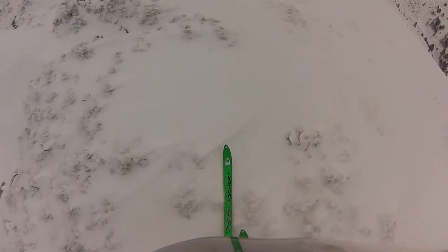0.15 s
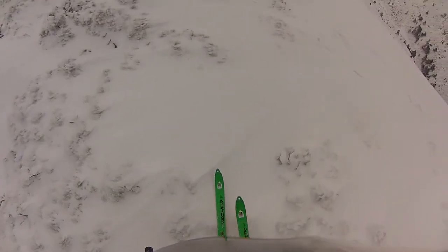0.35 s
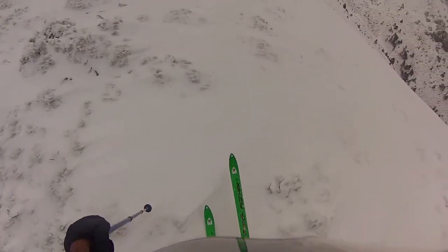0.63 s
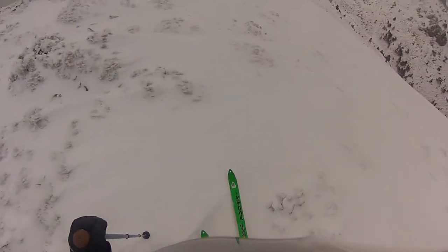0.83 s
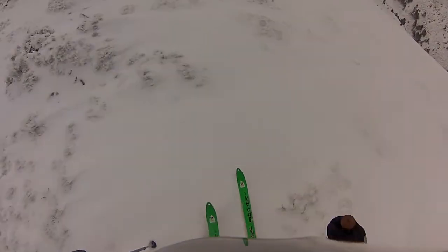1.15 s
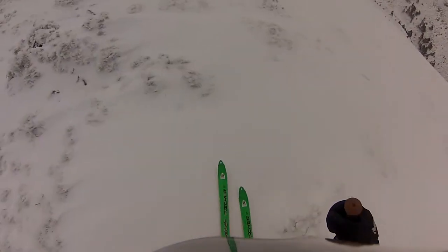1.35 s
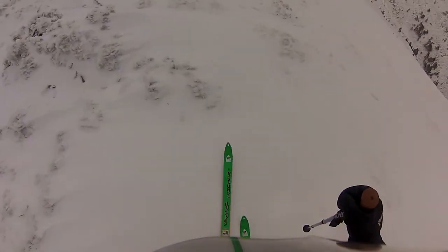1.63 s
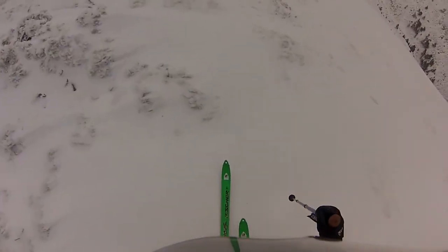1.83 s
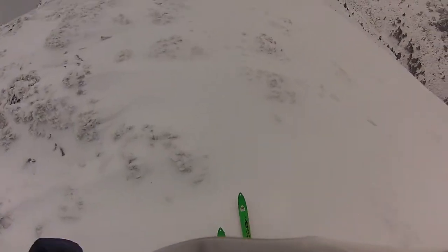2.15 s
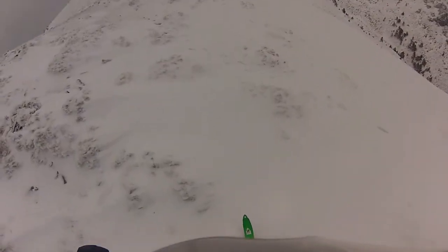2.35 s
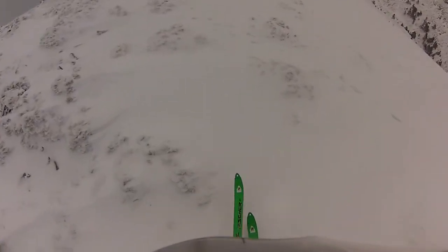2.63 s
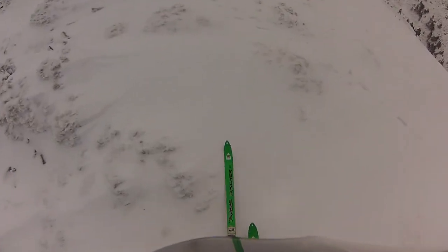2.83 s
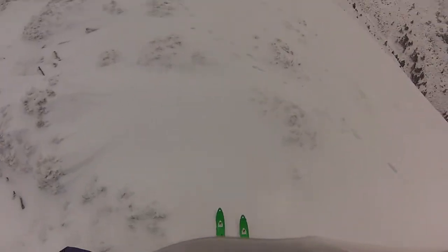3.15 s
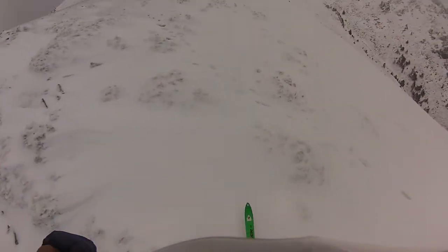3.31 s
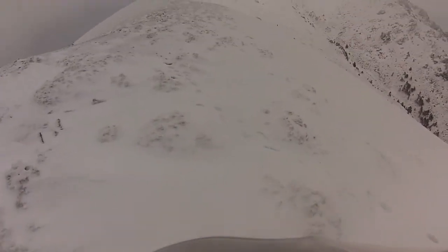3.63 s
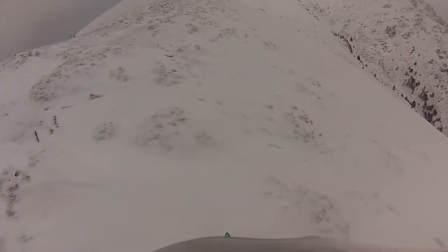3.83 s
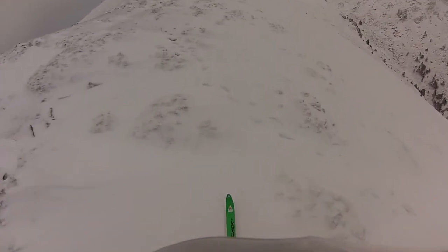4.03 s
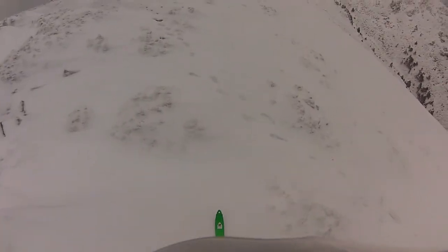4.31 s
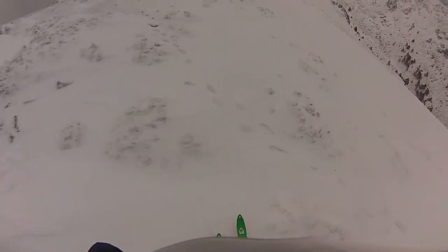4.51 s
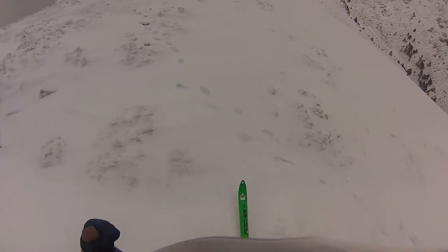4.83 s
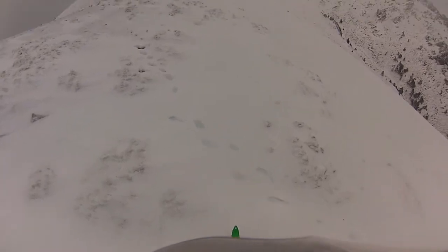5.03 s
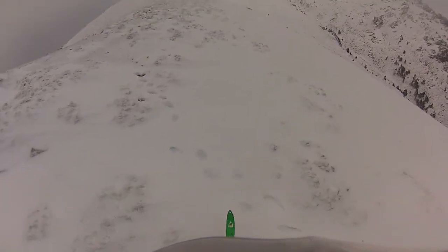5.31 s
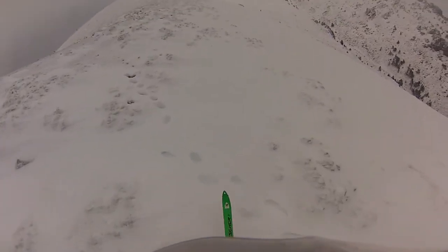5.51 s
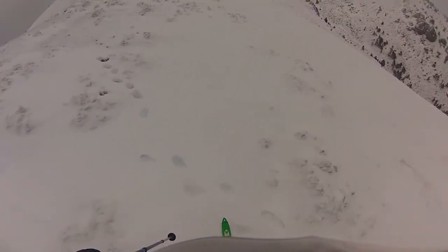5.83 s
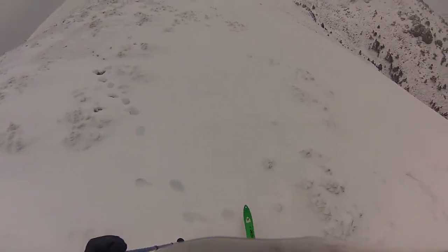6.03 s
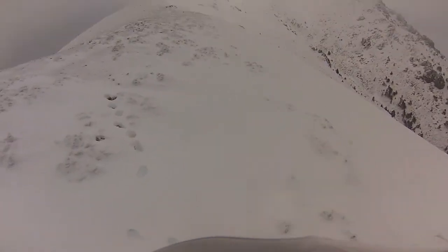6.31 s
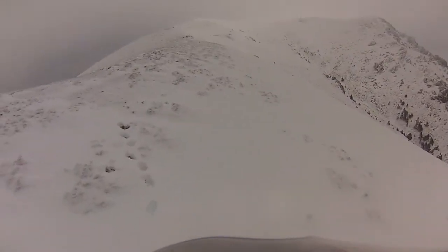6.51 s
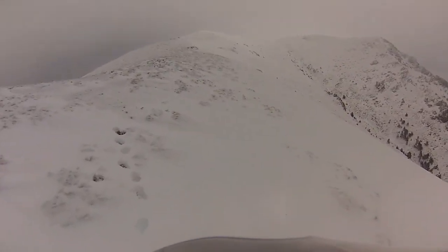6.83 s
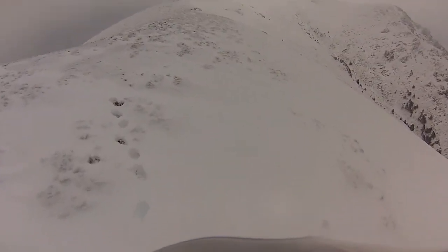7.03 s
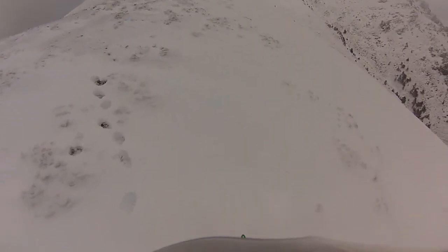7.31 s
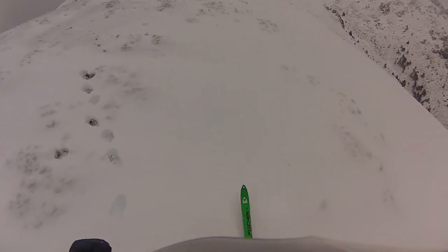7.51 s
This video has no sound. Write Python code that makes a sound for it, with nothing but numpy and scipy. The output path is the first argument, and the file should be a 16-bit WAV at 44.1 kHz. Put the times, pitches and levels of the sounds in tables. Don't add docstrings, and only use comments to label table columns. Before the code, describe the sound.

Outdoors on a snowy slope, a skier strides uphill, heard through a sealed plastic housing on the helmet: boxy, close, with deep wind rumble and faint hiss throughout. At 0 s crust cracks with a soft boot thud; around 0.14 s a buckle rings thinly. Crunches follow near 0.8, 1.5 and 2.3 s, gritty and brief, with soft ski glide between and ice grains clicking on the shell, one sharp at 1.9 s. Stronger crunches come at 2.9 and 3.5 s, with a light jolt. Around 4.1-4.2 s a loud knock and a hard low thump land together. It eases, with crunches near 4.8 s, then the hardest jolt booms at 5.65 s amid strong wind buffeting. Dense crunching, thuds and ticks continue through 6.2-6.9 s, a bright click snaps at 7.15 s, and a last crunch and thud end it around 7.6 s.

```python
import sys
import numpy as np
from scipy import signal
from scipy.fft import rfft, irfft
from scipy.io import wavfile
from scipy.ndimage import uniform_filter1d

SR = 44100
rng = np.random.default_rng(int(sys.argv[2]) if len(sys.argv) > 2 else 0)


def volts_from_decibels(level):
    exponent = np.asarray(level, float) / 20
    return 10 ** exponent


def master_out(mix):
    frames = np.transpose(np.atleast_2d(mix))
    ceiling = np.clip(frames, -1, 1)
    pcm = np.round(ceiling * 32767).astype(np.int16)
    wavfile.write(sys.argv[1], SR, pcm)


N = 337806


def rms_one(x):
    return x / np.sqrt(np.mean(x ** 2) + 1e-20)


def in_time(rows):
    s, *columns = np.transpose(rows)
    return [np.interp(np.arange(N) / SR, s, c) for c in columns]


def drift(rate):
    r = np.exp(-80 * np.pi * rate / SR)
    slow = signal.lfilter([1], [1, -2 * r, r * r], rng.standard_normal(N // 40 + 2002))[2000:]
    return np.interp(np.arange(N) / 40, np.arange(len(slow)), rms_one(slow))


def coloured(spectrum, low_hz, high_hz):
    hz = np.maximum(np.fft.rfftfreq(N, 1 / SR), .1)
    points = np.array(spectrum)
    gain = volts_from_decibels(np.interp(np.log(hz), np.log(points[:, 0]), points[:, 1]))
    gain = gain / np.sqrt((1 + (low_hz / hz) ** 8) * (1 + (hz / high_hz) ** 8))
    return rms_one(irfft(rfft(rng.standard_normal(N)) * gain, N))


def evened(x, size):
    return rms_one(x / np.sqrt(uniform_filter1d(x ** 2, size=size) + 0.2))


def swells(s, db, fall_s, rise_s, bed_db, hold_s=0):
    late = np.arange(0, N + 64, 64)[:, None] / SR - s
    below = np.maximum(-late / rise_s, np.maximum(late - hold_s, 0) / fall_s)
    power = volts_from_decibels(2 * (db - 10 * below)).sum(axis=1)
    power = np.interp(np.arange(N) / 64, np.arange(len(power)), power)
    return 10 * np.log10(power + volts_from_decibels(2 * bed_db))


def shell(x, modes):
    out = 0
    drives = np.broadcast_to(x, (len(modes), np.shape(x)[-1]))
    for k, ((hz, width, db), drive) in enumerate(zip(modes, drives)):
        r = np.exp(-np.pi * width / SR)
        a = [1, -2 * r * np.cos(2 * np.pi * hz / SR), r * r]
        b = np.array([1, 0, -1]) * (1 - r * r) / 2
        out = out + (-1) ** k * volts_from_decibels(db) * signal.lfilter(b, a, drive)
    return out


def steep(x, low_hz, high_hz):
    return signal.sosfilt(signal.butter(4, [low_hz, high_hz], "band", fs=SR, output="sos"), x)


def grains(per_s, spread_db):
    sizes = volts_from_decibels(spread_db * np.minimum(rng.exponential(1, N), 5)) * rng.choice([-1, 1], N)
    return rms_one(sizes * (rng.random(N) < per_s / SR))


def add(out, s, piece):
    i = max(round(s * SR), 0)
    out[i:i + len(piece)] += piece[:N - i]


def ring(hz, db, t60):
    t = np.arange(SR // 2) / SR
    return volts_from_decibels(db - 60 * t / t60) * np.sin(2 * np.pi * hz * t)


# [f/Hz, level/dB per Hz]
PRESSURE_SPECTRUM = [(2, -19), (4, -5.5), (9, 6.5), (14, -10), (20, -6), (30, -20), (45, -20), (65, -30.5),
                     (90, -25.5)]
# [f/Hz, level/dB per Hz]
RUMBLE_SPECTRUM = [(24, -16), (40, -5.5), (60, -2.5), (108, -2.5), (161, -21.5), (390, -35), (511, -38),
                   (581, -34), (942, -43), (1100, -43), (1200, -33.5), (1560, -58), (2640, -120)]
# [peak t/s, level/dB, 10 dB decay time/s]
GUSTS = [(0.159, -22.9, 0.215), (0.389, -22.4, 0.015), (0.939, -22.1, 0.384), (1.13, -25.4, 0.062),
         (1.608, -27.3, 0.161), (1.859, -28.2, 0.4), (2.351, -13.9, 0.155), (3.002, -17.3, 0.016),
         (3.117, -20.4, 0.045), (3.574, -14.4, 0.139), (3.968, -22.6, 0.015), (4.184, -14.1, 0.158),
         (4.885, -21.7, 0.279), (5.67, -12.1, 0.016), (5.73, -20.3, 0.4), (6.341, -15.1, 0.147),
         (6.72, -18.7, 0.015), (6.9, -14.6, 0.015), (7.078, -15.9, 0.039), (7.406, -20.0, 0.105)]
# [peak t/s, level/dB, 10 dB decay time/s]
BUFFETS = [(0.014, -36.9, 0.036), (0.238, -31.9, 0.021), (0.46, -34.6, 0.051), (0.947, -35.5, 0.066),
           (1.54, -27.7, 0.048), (2.323, -30.9, 0.031), (2.508, -42.4, 0.096), (2.91, -25.9, 0.015),
           (3.592, -24.1, 0.048), (3.95, -45.4, 0.035), (4.132, -31.0, 0.015), (4.239, -38.3, 0.018),
           (4.91, -24.0, 0.112), (5.736, -20.9, 0.036), (6.106, -37.8, 0.068), (6.358, -28.2, 0.015),
           (6.65, -38.1, 0.016), (6.871, -32.3, 0.054), (6.942, -43.2, 0.035), (7.123, -36.3, 0.017),
           (7.321, -41.7, 0.016), (7.654, -39.9, 0.017)]
# [peak t/s, level/dB, 10 dB decay time/s]
BOOMS = [(0.197, -36.3, 0.087), (0.806, -45.6, 0.015), (1.194, -50.2, 0.054), (1.837, -38.8, 0.015),
         (2.32, -37.4, 0.019), (2.448, -33.0, 0.018), (2.684, -37.3, 0.064), (2.8, -38.1, 0.31),
         (3.549, -36.5, 0.015), (3.679, -34.8, 0.015), (3.869, -37.7, 0.148), (4.232, -35.8, 0.152),
         (4.905, -39.7, 0.037), (5.65, -37.6, 0.289), (6.049, -40.9, 0.033), (6.309, -34.2, 0.106),
         (6.36, -35.3, 0.216), (6.87, -36.8, 0.155), (7.213, -42.1, 0.058), (7.654, -46.7, 0.398)]


def wind(crunch_db):
    pressure_db = swells(*np.transpose(GUSTS), rise_s=.079, bed_db=-40.5)
    buffet_db = swells(*np.transpose(BUFFETS), rise_s=.099, bed_db=-49.8)
    boom_db = swells(*np.transpose(BOOMS), rise_s=.074, bed_db=-48.3)
    pressure = evened(coloured(PRESSURE_SPECTRUM, low_hz=3.3, high_hz=23.8), size=SR // 4)
    buffet = evened(coloured(PRESSURE_SPECTRUM, low_hz=24.4, high_hz=66.4), size=SR // 6)
    boom = evened(coloured(RUMBLE_SPECTRUM, low_hz=64.5, high_hz=161), size=SR // 6)
    boom = boom * volts_from_decibels(1.8 * drift(18.6))
    rumble = coloured(RUMBLE_SPECTRUM, low_hz=169.4, high_hz=1090) * volts_from_decibels(1.7 * drift(32))
    rumble_db = -54.3 - 0.5 * np.arange(N) / SR
    rumble_db = rumble_db + 0.21 * (boom_db + 46.5) + 0.43 * (crunch_db + 58.5)
    return volts_from_decibels(pressure_db) * pressure + volts_from_decibels(buffet_db) * buffet + volts_from_decibels(boom_db) * boom + volts_from_decibels(rumble_db) * rumble


# [t/s, level/dB, hold/s]
CRUNCHES = [(0.012, -41.0, 0.028), (0.743, -54.9, 0.115), (0.899, -49.3, 0.023), (1.421, -49.4, 0.001),
            (1.487, -51.9, 0.032), (1.573, -54.2, 0.116), (2.228, -50.7, 0.097), (2.389, -44.1, 0.011),
            (2.858, -45.4, 0.06), (2.951, -53.6, 0.055), (3.433, -50.6, 0.035), (3.495, -43.9, 0.065),
            (3.615, -47.1, 0.032), (4.02, -48.9, 0.015), (4.056, -49.2, 0.041), (4.124, -48.8, 0.105),
            (4.793, -45.9, 0.041), (4.861, -48.8, 0.05), (5.392, -50.3, 0.0), (5.481, -50.7, 0.03),
            (5.58, -50.3, 0.102), (5.676, -40.9, 0.016), (5.742, -53.2, 0.058), (6.194, -45.8, 0.043),
            (6.297, -44.6, 0.04), (6.41, -46.9, 0.029), (6.79, -42.0, 0.004), (6.85, -52.1, 0.06),
            (6.95, -48.5, 0.023), (7.599, -50.9, 0.04)]
# [t/s, level/dB]
GLIDE = [
    (0.0, -57.4),
    (0.85, -60.9),
    (1.7, -57.9),
    (2.55, -59.4),
    (3.4, -58.9),
    (4.26, -61.5),
    (5.11, -60.9),
    (5.96, -58.2),
    (6.81, -54.7),
    (7.66, -61.0),
]


def crunch_level():
    s, db, hold_s = np.transpose(CRUNCHES)
    return swells(s, db, .027, .011, *in_time(GLIDE), hold_s)


# [f/Hz, width/Hz, level/dB]
SHELL_LOW = [(1262, 169, -6.5), (1507, 290, -0.5), (1728, 616, -3), (2066, 560, -3.5)]
SHELL_MID = [(3420, 500, 3.2), (4126, 480, 0.8), (4960, 520, -0.8)]
SHELL_HIGH = [(6554, 1560, 1.5), (9470, 1870, 1.5), (11380, 3800, -1), (15700, 2000, -28)]


def crunch(crunch_db):
    hiss_db = -66 + .15 * (crunch_db + 58)
    clumps = volts_from_decibels(3.0 * drift(60))
    snaps = clumps * grains(per_s=900 * clumps, spread_db=1.0) + .4 * rng.standard_normal(N)
    own = np.array([grains(per_s=350, spread_db=2.5) * volts_from_decibels(2.5 * drift(23)) for _ in SHELL_LOW])
    fine = grains(per_s=60, spread_db=3.5) * .3
    fine = fine + volts_from_decibels(2.1 * drift(35)) * rng.standard_normal(N)

    low = rms_one(steep(shell(snaps + 0.8 * own, SHELL_LOW), low_hz=1115, high_hz=2546))
    patches = volts_from_decibels(2.8 * np.array([drift(15) for _ in SHELL_MID]))
    mid_drive = patches * (snaps + 0.62 * own[:len(SHELL_MID), ::-1] + .5 * fine)
    mid = rms_one(steep(shell(mid_drive, SHELL_MID), low_hz=2780, high_hz=5860))
    high = rms_one(steep(shell(fine + 0.19 * snaps, SHELL_HIGH), low_hz=5430, high_hz=16100))
    mid_db = -0.8 + .45 * hiss_db + 0.645 * (crunch_db - 3.6)
    return volts_from_decibels(crunch_db - 2.2) * low + volts_from_decibels(mid_db) * mid + volts_from_decibels(hiss_db - 6.3 + 1.2 * drift(9)) * high


# [t/s, peak level/dB, f/Hz]
KNOCKS = [(.0727, -45.5, 1560), (.4244, -43, 1350), (.8897, -39.5, 1710), (1.482, -44, 1550),
          (1.6367, -41.5, 1720), (2.1768, -44.5, 2270), (2.248, -40, 1250), (2.7637, -40, 1450),
          (2.8886, -35, 2150), (3.271, -42, 2300), (3.3323, -45, 1420), (3.4316, -45, 1460),
          (3.5024, -37, 1230), (4.0148, -40.5, 1690), (4.055, -44, 2000), (4.118, -28, 1900),
          (4.1593, -36.5, 1640), (4.7013, -37, 1750), (4.786, -44, 1500), (4.8663, -38.5, 1320),
          (5.2395, -44.5, 2470), (5.4695, -44, 1460), (5.6732, -37.5, 1310), (6.097, -37.5, 1560),
          (6.1878, -41.5, 1410), (6.4135, -37, 1360), (6.782, -40, 1480), (6.992, -42, 1450),
          (7.4038, -47, 1400), (7.5876, -44, 1380)]
# [t/s, peak level/dB, f/Hz]
CRUMBS = [(0.0154, -34, 1680), (0.0344, -37, 1480), (0.1545, -44, 2100), (0.2399, -45, 1580),
          (0.5601, -44, 2140), (0.7544, -43, 1430), (0.7771, -40, 1230), (0.7926, -40, 1570),
          (0.9144, -39, 1310), (1.0585, -43, 1410), (1.1253, -42, 2220), (1.4087, -43, 1570),
          (1.4326, -42, 1560), (1.8567, -43, 1570), (2.1475, -45, 2120), (2.2084, -46, 1510),
          (2.2233, -42, 1540), (2.372, -44, 1330), (2.3885, -39, 1310), (2.6778, -42, 2100),
          (2.8519, -36, 1550), (2.9607, -42, 1320), (3.3747, -45, 1480), (3.4655, -37, 2020),
          (3.5523, -39, 1630), (3.5768, -40, 1200), (3.6296, -39, 1840), (4.3605, -46, 1510),
          (4.8179, -34, 1230), (5.3916, -43, 1690), (5.6092, -35, 1400), (5.7428, -40, 1260),
          (6.2537, -40, 1480), (6.2881, -39, 1480), (6.3135, -34, 1420), (6.4642, -34, 1610),
          (6.8044, -39, 1980), (6.9456, -37, 1490), (7.0798, -42, 1270), (7.1197, -46, 1510),
          (7.2404, -40, 1640), (7.4754, -45, 1560), (7.5368, -47, 1430), (7.639, -39, 1660)]


def knocks(lumps, gain_db, crumble_s):
    out, t = np.zeros(N), np.arange(SR // 20) / SR
    for (s, db, hz), noise in zip(lumps, rng.standard_normal((len(lumps), len(t)))):
        burst = noise * np.exp(-t / crumble_s) + 9.0 * (t == 0)
        knock = steep(shell(burst, SHELL_LOW), low_hz=1060, high_hz=3230)
        knock = knock + shell(knock, [(hz, 320, 8.0)])
        add(out, s - .0008, volts_from_decibels(db + gain_db) * knock / np.abs(knock).max())
    return out


# [t/s, peak level/dB]
THUDS = [(0.014, -46), (0.914, -48), (1.416, -52), (2.394, -42), (3.062, -46), (3.5, -37), (3.622, -51),
         (4.106, -42), (4.237, -35.5), (5.621, -36), (6.335, -30.5), (6.393, -36.5), (7.657, -36)]


def thuds():
    out, t = np.zeros(N), np.arange(SR // 10) / SR
    for (s, db), noise in zip(THUDS, rng.standard_normal((len(THUDS), len(t)))):
        puff = signal.lfilter([1], [1, -.95], noise * np.exp(-t / 0.011))
        puff = steep(puff, low_hz=125, high_hz=950)
        add(out, s - .001, volts_from_decibels(db - 2.5) * puff / np.abs(puff).max())
    return out


# [t/s, level/dB]
JOLTS = [
    (3.49, -36),
    (3.63, -39),
    (4.228, -29),
    (5.652, -26),
    (6.205, -34),
]


def jolts():
    out = np.zeros(N)
    for s, db in JOLTS:
        add(out, s, ring(110, db, t60=.3))
    return out


# [t/s, peak level/dB, brightness level/dB, strongest middle f/Hz]
TICKS = [(0.1289, -45.3, 6.2, 3250), (0.634, -43.6, 2.9, 3410), (0.6437, -51.8, 11.2, 3470),
         (0.8008, -45.9, 9.0, 4590), (0.9035, -33.4, 4.3, 4050), (1.0558, -42.1, 5.5, 4940),
         (1.6495, -41.2, -0.0, 4810), (1.7946, -34.9, 1.9, 3460), (1.8665, -26.6, -3.7, 3400),
         (1.9692, -40.0, -2.2, 3400), (2.1761, -40.1, 5.2, 3610), (2.2666, -32.7, -5.1, 3420),
         (2.7201, -32.9, -3.8, 3430), (2.9905, -32.1, -5.5, 3410), (3.0529, -30.3, 0.3, 3390),
         (3.5019, -39.8, -11.7, 4010), (3.5747, -36.4, -18.4, 3490), (3.6828, -35.1, -7.5, 3420),
         (4.0205, -52.8, 13.0, 3420), (4.5677, -35.8, 0.7, 4520), (5.2408, -30.1, -0.2, 3410),
         (5.3477, -42.4, -0.1, 3420), (5.6996, -35.5, -12.3, 3430), (5.7458, -32.2, -10.4, 3420),
         (5.9067, -38.1, -5.4, 3390), (6.4646, -40.5, 20.1, 5140), (6.7202, -38.3, 0.5, 4220),
         (6.7738, -39.9, -9.1, 4820), (7.1502, -26.4, -1.6, 3390), (7.567, -41.5, -0.6, 4800)]
# [t/s, peak level/dB, brightness level/dB]
SPECKS = [(0.4215, -56.6, 9.1), (0.5585, -41.6, -13.8), (0.7925, -50.7, 9.1), (0.8215, -48.2, 8.4),
          (1.1253, -45.1, -0.1), (1.3582, -54.1, 10.9), (1.4845, -49.5, 6.0), (1.9342, -48.9, 6.3),
          (1.9526, -54.7, 9.8), (2.1106, -46.2, -4.1), (2.611, -53.2, 7.0), (2.7326, -48.9, 0.3),
          (2.7673, -43.2, -2.3), (3.1307, -44.7, -2.5), (4.1171, -45.2, -6.2), (4.6349, -51.2, 1.9),
          (5.1538, -53.0, 5.8), (5.1748, -49.8, 9.7), (5.249, -45.4, 3.4), (5.326, -48.0, 0.7),
          (5.781, -41.6, -3.6), (5.9653, -42.9, 1.7), (6.0568, -43.2, 1.9), (6.1232, -55.9, 10.4),
          (6.1815, -43.1, -3.0), (6.3717, -44.9, -2.0), (6.5162, -53.2, 6.3), (7.0667, -45.0, -0.9),
          (7.2461, -39.0, -2.3), (7.3107, -52.4, 7.8)]


def ticks():
    spots_hz = rng.choice([3400, 3550, 4700], len(SPECKS))
    hits = list(TICKS) + [(*row, hz) for row, hz in zip(SPECKS, spots_hz)]
    out, t = np.zeros(N), np.arange(SR // 20) / SR
    for (s, db, bright_db, hz), noise in zip(hits, rng.standard_normal((len(hits), len(t)))):
        burst = noise * np.exp(-t / 0.0008) + 4.0 * (t == 0)
        mid = shell(burst, SHELL_MID)
        mid = rms_one(mid + shell(mid, [(hz, 1200, 0.0)]))
        scatter = steep(noise[::-1] * np.exp(-t / 0.0007), low_hz=2300, high_hz=5700)
        mid = mid + .6 * rms_one(scatter) + .25 * rms_one(shell(burst, SHELL_LOW))
        high = steep(shell(burst, SHELL_HIGH), low_hz=5400, high_hz=16100)
        tick = mid / np.abs(mid).max() + volts_from_decibels(bright_db) * high / np.abs(high).max()
        add(out, s - .0002, volts_from_decibels(db - .5) * tick)
    return out


# [t/s, peak level/dB, f/Hz]
FLECKS = [(0.4349, -50, 4140), (0.7362, -51, 3310), (0.7467, -48, 5070), (1.1089, -45, 3320),
          (1.4122, -48, 4130), (1.5179, -48, 4190), (1.5913, -45, 4850), (1.6122, -49, 3400),
          (2.0453, -49, 3510), (2.385, -52, 3360), (2.4588, -48, 3580), (2.5087, -53, 4210),
          (2.6579, -48, 3390), (2.6768, -50, 3320), (2.8858, -40, 3310), (2.9044, -46, 3320),
          (2.9194, -48, 3280), (3.022, -50, 3540), (3.1896, -49, 4830), (3.268, -46, 3430),
          (3.2914, -53, 3980), (3.3293, -48, 3910), (3.4042, -47, 4780), (4.0577, -47, 3250),
          (4.2413, -45, 3030), (4.2602, -46, 3380), (4.3615, -53, 3350), (4.4278, -44, 3190),
          (4.4628, -51, 3260), (4.4752, -53, 4030), (4.6024, -52, 3340), (4.7995, -44, 3180),
          (4.8708, -48, 3110), (5.0519, -52, 3240), (5.5308, -49, 4370), (5.6027, -47, 5140),
          (5.6301, -47, 3380), (5.6605, -44, 4170), (5.6745, -41, 3280), (5.9249, -48, 5100),
          (5.9394, -50, 3380), (6.0861, -50, 3030), (6.2213, -46, 3540), (6.2532, -50, 3670),
          (6.2781, -46, 3170), (6.3414, -43, 3000), (6.3574, -44, 3260), (6.4088, -48, 3360),
          (6.5241, -45, 4860), (6.5394, -48, 3310), (6.996, -51, 4010), (7.0294, -52, 3430),
          (7.1082, -45, 3330), (7.1921, -51, 3560), (7.3402, -53, 4210), (7.3991, -53, 3310),
          (7.457, -49, 4640), (7.4734, -50, 4130), (7.5867, -47, 3410), (7.6231, -44, 3400)]


def flecks():
    out, t = np.zeros(N), np.arange(SR // 40) / SR
    for (s, db, hz), noise in zip(FLECKS, rng.standard_normal((len(FLECKS), len(t)))):
        burst = noise * np.exp(-t / 0.0011) + 2.5 * (t == 0)
        spot = rms_one(shell(burst, [(hz, 800, 0.0)]))
        fleck = spot + .4 * rms_one(steep(burst, low_hz=2900, high_hz=9000))
        add(out, s - .0002, volts_from_decibels(db - 2.5) * fleck / np.abs(fleck).max())
    return out


# [t/s, level/dB, decay/ms, brightness level/dB]
SPRAYS = [(0.127, -51, 13, 2), (.635, -63.5, 12, 2.5), (1.056, -49, 10.3, 0), (1.649, -61.5, 15, 6),
          (1.968, -64, 15, 4), (2.264, -52.5, 10, -1), (3.678, -53.5, 13, -3.5), (4.018, -52.5, 5.9, -7),
          (4.24, -60, 20, -2.5), (4.419, -61.5, 20, -5), (5.6, -59, 27, 1), (5.67, -51.5, 29, -8),
          (5.77, -63, 26, -4), (6.118, -57.5, 6.5, 2.5), (6.338, -57, 40, -3), (7.6, -64, 20, -11)]


def sprays():
    out, shower = np.zeros(N), grains(per_s=3400, spread_db=3.0)
    mid, high = (rms_one(shell(shower, m)) for m in (SHELL_MID, SHELL_HIGH))
    t = np.arange(SR // 5) / SR
    for s, db, ms, bright_db in SPRAYS:
        i = round(s * SR)
        piece = (mid + volts_from_decibels(bright_db) * high)[i:i + len(t)]
        envelope = np.exp(-t * 1000 / ms) * np.minimum(t / 0.00074, 1)
        add(out, s, volts_from_decibels(db) * piece * envelope[:len(piece)])
    return out


# [f/Hz, level/dB, t60/s]
BUCKLE = [(3623, -62, .28), (3978, -65, .25), (4213, -63, .35), (4701, -61, .23), (4815, -64, .2),
          (5184, -65, .2), (7472, -67, .25), (7936, -62, .33)]
# [t/s, f/Hz, level/dB, t60/s]
PINGS = [
    (3.562, 8620, -60, .16),
    (4.156, 8620, -59, .09),
    (.425, 1370, -48, .06),
    (7.402, 1370, -48, .06),
]


def metal():
    out = np.zeros(N)
    add(out, 0.14, sum(ring(*mode) for mode in BUCKLE))
    for s, *mode in PINGS:
        add(out, s, ring(*mode))
    return out


def body(crunch_db):
    hollow = shell(grains(per_s=500, spread_db=3.0), [(596, 120, 0.0)])
    return volts_from_decibels(-75 + .95 * (crunch_db + 58)) * rms_one(hollow)


def air():
    hiss = coloured([(2500, 0), (4300, -2), (6000, -5), (9000, -12)], low_hz=2600, high_hz=9000)
    return volts_from_decibels(-75 + .8 * drift(4)) * hiss


def scene():
    crunch_db = crunch_level()
    mix = wind(crunch_db) + crunch(crunch_db)
    mix = mix + knocks(KNOCKS, gain_db=2.5, crumble_s=.0035) + knocks(CRUMBS, gain_db=-2.0, crumble_s=.005)
    mix = mix + thuds() + jolts() + ticks() + flecks() + sprays() + metal()
    return (mix + body(crunch_db) + air())[None]


def starve_treble(x, half_hz, top_hz):
    hz, _, cells = signal.stft(x, SR, nperseg=1024)
    bands = cells[:512].reshape(128, 4, -1)
    level_db = 10 * np.log10(np.mean(np.abs(bands) ** 2, axis=1) + 1e-20)
    band_hz = hz[:512:4, None]
    over_db = level_db - np.median(level_db, axis=1, keepdims=True)
    mood_db = 3 * drift(6)[::512][np.minimum(np.arange(bands.shape[2]), N // 512)]
    luck_db = 6 * uniform_filter1d(rng.standard_normal(level_db.shape), size=3, axis=1)
    need_db = 3.5 * (band_hz - half_hz) / 1000 + 14 * (band_hz > top_hz) - 8 * (band_hz < 12600)
    keep = over_db + mood_db + luck_db > need_db
    keep = keep * volts_from_decibels(-4 * (band_hz > top_hz) - 8 * (band_hz > top_hz + 450))
    cells[:512] = (bands * keep[:, None]).reshape(512, -1)
    cells[hz > 16500] = 0
    return signal.istft(cells, SR, nperseg=1024)[1][:N]


def band_limit(x):
    return signal.sosfilt(signal.butter(12, 16520, fs=SR, output="sos"), x)


def record(dry):
    rounded = 0.61 * np.tanh(dry[0] / .6)
    mix = starve_treble(rounded, half_hz=14200, top_hz=15350)[None]
    return band_limit(mix)


dry = scene()
out = record(dry)
master_out(out)
```